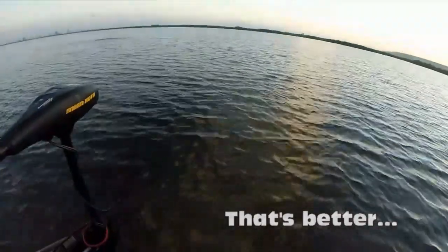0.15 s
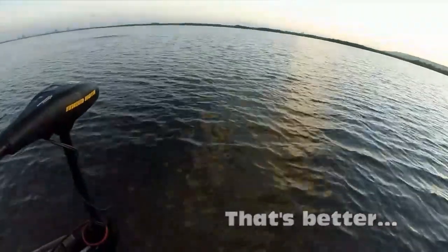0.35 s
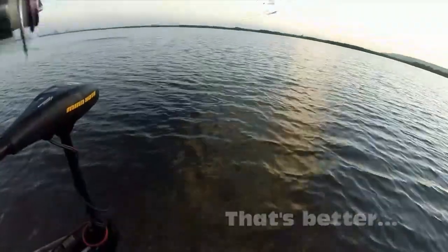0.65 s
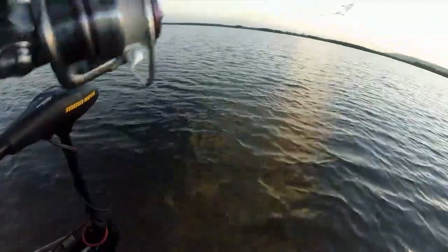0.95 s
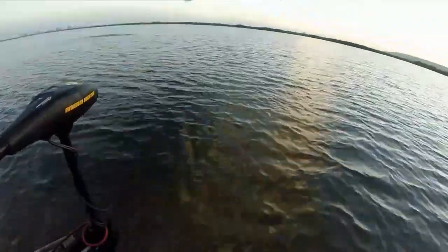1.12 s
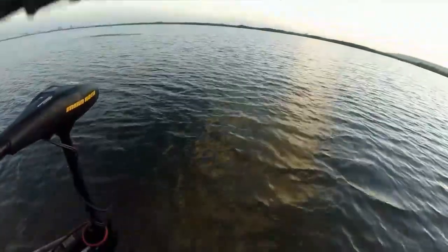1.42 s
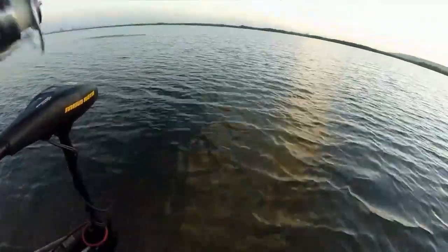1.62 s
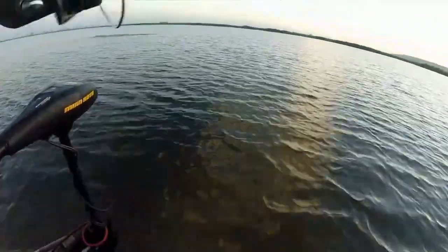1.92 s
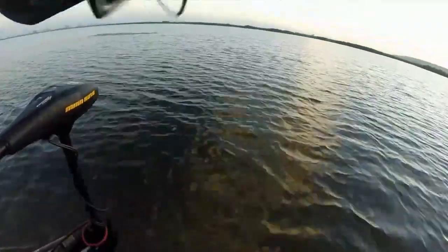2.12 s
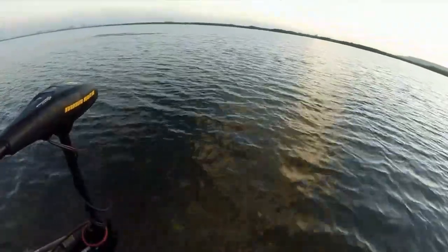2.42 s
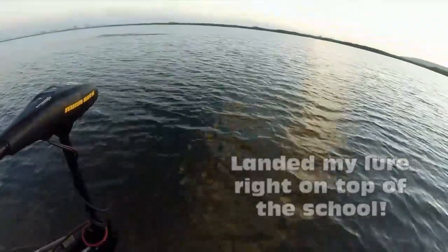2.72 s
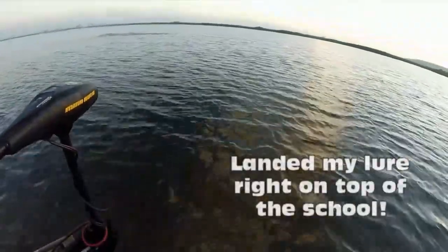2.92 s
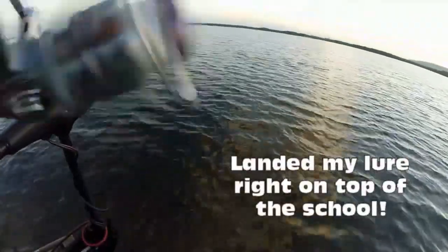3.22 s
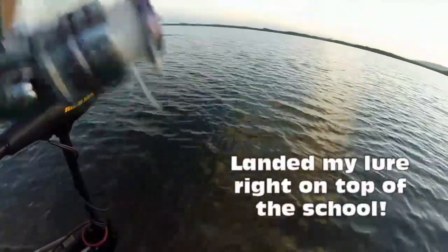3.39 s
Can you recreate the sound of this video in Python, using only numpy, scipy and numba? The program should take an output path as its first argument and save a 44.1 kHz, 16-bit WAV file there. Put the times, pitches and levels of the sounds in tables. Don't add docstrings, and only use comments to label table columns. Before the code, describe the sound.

Spinning reel clicks and buzzes brightly in four pulls, stopping in single ticks, over lapping water

```python
import sys
import numpy as np
from scipy import signal
from scipy.io import wavfile
from scipy.ndimage import uniform_filter1d
from numba import njit

SR = 44100
rng = np.random.default_rng(int(sys.argv[2]) if len(sys.argv) > 2 else 0)


def linear_from_db(decibels):
    return 10 ** (np.asarray(decibels, float) / 20)


def unload_audio(sound):
    columns = np.transpose(np.atleast_2d(sound))
    steps = np.round(np.clip(columns, -1, 1) * 32767)
    wavfile.write(sys.argv[1], SR, steps.astype(np.int16))


N = 156555


@njit
def ring(x, poles, hit):
    y, z = np.empty(len(x)), 0j
    for i in range(len(x)):
        z = z * poles[hit[i]] + x[i]
        y[i] = z.imag
    return y


def band(x, hz, width_hz):
    return signal.lfilter(*signal.iirpeak(hz, hz / width_hz, SR), x)


def level(x, db):
    return x * linear_from_db(db) / np.sqrt(np.mean(x ** 2))


def walk(rate_hz):
    hold = int(SR / rate_hz)
    steps = np.repeat(rng.standard_normal(N // hold + 1), hold)
    return 2.34 * uniform_filter1d(uniform_filter1d(steps, hold), hold)[:N]


def add(out, start_s, sound):
    i = int(start_s * SR)
    out[i:i + len(sound)] += sound[:N - i]


def air():
    # frequency in Hz, level in dB per Hz.
    spectrum = [(15, -37), (25, -4.5), (104, 2.5), (403, -16), (966, -6), (1260, -25.5), (3530, -32),
                (4140, -35.5), (14000, -47.5)]
    table_hz, table_db = np.array(spectrum).T
    out = 0
    for hz in 28 * 2 ** np.arange(0, 9.4, .5):
        flicker_db = 1.5 * walk(7.02)
        db = np.interp(np.log(hz), np.log(table_hz), table_db) + flicker_db
        noise = rng.standard_normal(N)
        out = out + linear_from_db(db) * band(band(noise, hz, hz / 2), hz, hz / 2)
    return level(out, -41)


def tackle():
    # start in seconds, peak in dB, pitch in Hz.
    knocks = [
        (0.0107, -54, 4340),
        (0.0192, -43, 3750),
        (0.0858, -53.5, 2400),
        (3.483, -50, 2420),
    ]
    t, out = np.arange(600) / SR, np.zeros(N)
    for start_s, peak_db, hz in knocks:
        burst = rng.standard_normal(600) * np.exp(-t / 0.0035)
        add(out, start_s, linear_from_db(peak_db + 13.5) * band(burst, hz, 1700))
    return out


def bubble(hz, t60_s, glide=0.02):
    t = np.arange(int(.05 * SR)) / SR
    tone = np.sin(2 * np.pi * hz * t * (1 + glide * t / t60_s))
    return tone * linear_from_db(-60 * t / t60_s) * (1 - np.exp(-t / 0.0013))


def water():
    # start in seconds, peak in dB, pitch in Hz.
    laps = [(0.017, -32, 690), (0.038, -41, 470), (0.0625, -32, 715), (0.242, -37, 816), (0.299, -32, 924),
            (0.334, -27.5, 847), (0.373, -29.5, 975), (0.403, -30.5, 717), (0.465, -30, 742),
            (0.519, -31, 695), (0.549, -26, 746), (0.574, -28, 890), (0.619, -30, 888), (0.639, -32.5, 745),
            (0.703, -31, 986), (0.781, -32, 790), (0.833, -31, 662), (0.957, -27.5, 912), (1.033, -28, 730),
            (1.135, -32, 590), (1.347, -29.5, 729), (1.623, -32, 1113), (1.729, -32, 758.4),
            (1.448, -35, 910), (1.897, -32.5, 883), (1.994, -35.5, 870), (2.061, -31.5, 795),
            (2.416, -33.5, 521.5), (2.574, -35, 707.7), (2.595, -32.5, 953), (2.708, -36, 948),
            (2.76, -34, 803), (2.813, -37, 966), (3.046, -33, 696.4), (3.119, -30, 847), (3.413, -35, 914),
            (3.433, -38, 730), (3.452, -43, 1030), (3.482, -33, 536)]
    bubbles_per_lap, lap_s, gurgles_per_s = 5, .035, 200
    out = np.zeros(N)
    for start_s, peak_db, hz in laps:
        for k, (late, tune, size) in enumerate(rng.random((bubbles_per_lap, 3))):
            later = k > 0
            db = peak_db + 3 - later * (4 + 8 * size)
            pitch_hz = hz * (1 + later * 0.34 * (tune - .5))
            add(out, start_s + later * late * lap_s, linear_from_db(db) * bubble(pitch_hz, 0.05))
    for when, tune, size in rng.random((int(gurgles_per_s * N / SR), 3)):
        gurgle_db = -55 + 17.5 * size ** 2
        gurgle_hz = 844 * linear_from_db(4.49 * (tune - 2.5))
        add(out, when * N / SR, linear_from_db(gurgle_db) * bubble(gurgle_hz, 0.023))
    return out


def spool_speed():
    # time in seconds, teeth per second in Hz.
    pull_1 = [(.19, 119), (0.73, 230), (0.781, 346.6), (0.859, 424.8), (0.939, 191.7)]
    pull_2 = [(1.02, 448.7), (1.25, 564), (1.31, 720), (1.36, 1000), (1.44, 1106), (1.528, 891),
              (1.556, 712), (1.602, 402), (1.67, 199.5)]
    pull_3 = [(1.74, 330.4), (1.84, 378.5), (1.929, 537), (2.021, 430), (2.079, 275)]
    pull_4 = [(2.13, 278), (2.189, 429), (2.265, 805.4), (2.375, 798), (2.45, 499.8), (2.749, 390.9),
              (3.081, 688), (3.199, 503), (3.272, 159)]
    t = np.arange(N) / SR
    time_s, speed_hz = np.vstack([pull_1, pull_2, pull_3, pull_4]).T
    rate_hz = np.interp(t, time_s, speed_hz)
    running = (t > time_s[0]) & (t < time_s[-1])
    teeth = np.cumsum(rate_hz * running) / SR
    return rate_hz, running, teeth


def pawl_strikes(rate_hz, teeth):
    # time in seconds, level in dB, spool against pawl in dB,
    # pawl brightness in dB per kHz.
    pulls = [
        [(.15, -40.5, -0.5, 5.5), (.34, -30.5, -6, 9.5), (.5, -30, 1.5, 7), (.62, -31.5, -5.5, 4),
         (.75, -27.5, -5.5, 1.5), (.895, -29.5, -5, 14.5), (.94, -35.5, -5, 6.5)],
        [(1.03, -36, 3.5, 8.5), (1.12, -37.5, 3, 6.5), (1.21, -32, -1, 6.5), (1.31, -32, 2, 6.5),
         (1.5, -31, -10.5, 9.5), (1.575, -28.5, -1.5, 3.5), (1.63, -31.5, 1.5, 5.5)],
        [(1.7, -29.5, -3, 8.5), (1.79, -26, -6.5, 5.5), (1.92, -33, -1.5, 6.5), (2.04, -39.5, 5, 4)],
        [(2.12, -36.5, -2.5, 7), (2.23, -36, 5, 6), (2.45, -34, 4, 4), (2.72, -29, -5.5, 5), (2.9, -28, 1, 3),
         (3.09, -34.5, 7, 1), (3.22, -27, -2, 4), (3.27, -33.5, -3.5, 9), (3.35, -66, 9, 4)],
    ]
    # time in seconds, peak in dB.
    ticks = [
        (0.1437, -32),
        (0.159, -28),
        (0.1706, -34),
        (0.1796, -26.5),
        (3.2777, -24),
        (3.2908, -29),
        (3.3027, -28.5),
        (3.3199, -29.5),
        (3.3451, -30),
    ]
    # time in seconds,
    # level in dB.
    separate_teeth = [(0.1886, -35.0), (0.1959, -33.0), (0.2036, -31.0), (0.2108, -31.0), (0.2186, -30.5),
                      (0.2256, -31.0), (0.2345, -32.0), (0.2408, -30.5), (0.2473, -30.0), (0.2546, -32.0),
                      (0.2622, -33.5), (0.2697, -31.0), (0.2776, -26.5), (0.2851, -25.5), (0.2914, -29.0),
                      (0.2971, -31.5), (0.3022, -35.0), (0.3075, -31.0), (0.3122, -32.5), (0.317, -28.0),
                      (0.3213, -25.5), (0.3258, -27.0), (0.3301, -30.0), (0.3344, -27.0), (0.3385, -28.5),
                      (0.3474, -26.5), (0.3509, -26.5), (0.3551, -25.0), (0.3601, -29.5), (0.3646, -29.5),
                      (0.3688, -29.0), (0.3779, -27.0), (0.3824, -28.5), (0.3868, -26.5), (0.3902, -28.0),
                      (0.395, -26.0), (0.3998, -28.0), (0.4048, -28.5), (0.4093, -29.5), (0.4161, -27.5),
                      (0.4231, -30.0), (0.431, -28.5), (0.4404, -29.5), (0.447, -30.0), (0.4546, -28.5),
                      (0.4621, -30.0), (0.4707, -31.5), (0.4797, -33.5), (0.4886, -30.5), (0.4973, -29.0),
                    (0.5058, -28.5), (0.5143, -28.0), (0.5222, -30.5), (0.5295, -31.5), (0.5367, -31.0),
                    (0.5437, -28.5), (0.5503, -26.0), (0.5574, -25.5), (0.564, -22.0), (0.5702, -22.5),
                    (0.5765, -23.0), (0.5811, -26.0), (0.5913, -27.0), (0.5957, -30.0), (0.6001, -29.5),
                    (0.6055, -26.0), (0.6094, -28.0), (0.6143, -26.0), (0.6182, -28.0), (0.6227, -31.0),
                    (0.6272, -31.0), (0.6317, -29.0), (0.6366, -23.0), (0.6406, -27.5), (0.6454, -29.0),
                    (0.6509, -25.0), (0.6565, -27.5), (0.6612, -32.5), (0.6672, -24.5), (0.6731, -21.0),
                    (0.679, -22.0), (0.6851, -21.5), (0.6911, -21.5), (0.6978, -18.5), (0.7025, -23.0),
                    (0.707, -28.0), (0.7118, -26.5), (0.7162, -27.5), (0.7196, -31.5), (0.7249, -23.0),
                    (0.729, -28.0), (0.7333, -26.5), (0.7371, -28.5)]
    # time in seconds, extra dB.
    high_spots = [(.285, 1.5), (.572, -1), (.674, -1.5), (.686, 2), (.698, 1.5), (0.773, 5.5), (.812, 3.5),
                  (0.835, 4.5), (1.561, 1.5), (1.73, 5), (1.751, 4.5), (1.811, 6), (1.869, 4), (1.919, 4),
                  (2.221, 2.5), (2.962, -0.5), (2.979, 2.5), (3.022, 1.5), (3.132, 3), (3.197, 2)]
    t = np.arange(N) / SR
    force_s, force_db, spool_db, bright_db = np.vstack(pulls).T
    lone = np.array(ticks)
    apart = np.array(separate_teeth)

    count = int(teeth[-1])
    jitter_teeth = .05 * rng.standard_normal(count)
    at_s = np.interp(np.arange(count) + jitter_teeth, teeth, t)
    density_db = 10 * np.log10(np.interp(at_s, t, rate_hz) / 100)
    scatter_db = 1.0 * rng.standard_normal(count)
    surge_db = .7 * np.interp(at_s, t, walk(60))
    db = np.interp(at_s, force_s, force_db) - density_db + scatter_db + surge_db

    blurred = at_s > apart[-1, 0] + .003
    at_s = np.r_[at_s[blurred], lone[:, 0], apart[:, 0]]
    db = np.r_[db[blurred], lone[:, 1] - 9, apart[:, 1] - 7.5]
    order = np.argsort(at_s)
    at_s, db = at_s[order], db[order]
    high_spot_s = 0.0079
    press_db = sum(extra_db * np.exp(-((at_s - s) / high_spot_s) ** 2) for s, extra_db in high_spots)
    return at_s, db, press_db, np.interp(at_s, force_s, spool_db), np.interp(at_s, force_s, bright_db)


def rattle(rate_hz, teeth):
    # frequency in Hz, level in dB, t60 in seconds,
    # share of the high spot in dB per dB.
    pawl_modes = [(7110, -25.5, 0.0033, 0.49), (7390, -10, 0.013, .3), (8480, 3, 0.0021, 0.33),
                  (8840, 1.5, 0.0058, 2.97), (9330, 3.5, 0.013, 2.17), (9670, -0.5, 0.0052, 0.23),
                  (10700, 5.5, 0.0081, 0.23), (11090, 4, 0.0042, 0.37), (11637, -5, .014, 0.15),
                  (13460, -20, 0.0057, .2), (14300, -14, 0.0047, .2)]
    spool_modes = [(1970, -15, 0.004, 0.2), (3070, -22, 0.017, -2), (3470, -41.5, 0.46, -13),
                   (3600, -19, 0.032, -2), (4446, -13.5, 0.029, -2), (5050, -12, 0.021, 2.5),
                   (5320, -15, 0.014, 2.5), (6050, -44, 0.35, -6), (6080, -41, 0.23, -5),
                   (6101, -46.5, 0.2, -2), (6570, -13.5, 0.0052, -8), (6450, -9, 0.0031, 2.8)]
    # time in seconds, pitch ratio.
    sag = [(1.0, 1.0), (1.17, 0.88), (1.36, 0.98), (1.95, 1.0), (2.1, .93), (2.42, 1.0)]
    at_s, db, press_db, spool_db, bright_db = pawl_strikes(rate_hz, teeth)
    where = (at_s * SR).astype(int)
    hit = np.clip(np.searchsorted(at_s, np.arange(N) / SR) - 1, 0, None)
    chatter_s = 0.0025
    fade = np.exp(-1 / (chatter_s * SR))
    grit = rng.standard_normal(N) * linear_from_db(2)

    def flicks(gain_db):
        snap = np.zeros(N)
        snap[where] = linear_from_db(db + gain_db)
        chatter = grit * signal.lfilter([1], [1, -fade], snap)
        return 1.7 * snap + 0.34 * chatter + 1e-18

    out = 0
    for k, (hz, mode_db, t60_s, share) in enumerate(pawl_modes + spool_modes):
        scatter_db = 1.5 * rng.standard_normal(len(at_s))
        drift_db = 1.8 * walk(6.924)[where]
        gain_db = mode_db + share * press_db + scatter_db + drift_db
        if k >= len(pawl_modes):
            gain_db = gain_db + spool_db
        else:
            gain_db = gain_db + bright_db * np.clip(hz / 1000 - 10.6, -1.2, 1.2)
        detune = .01 * (t60_s < .1)
        tune_hz = hz * (1 + detune * (.4 * walk(5)[where] + rng.standard_normal(len(at_s))))
        if 10000 < hz < 11200:
            tune_hz = tune_hz * np.interp(at_s, *np.array(sag).T)
        if t60_s > .1 and hz > 5000:
            gain_db = gain_db + 20.5 * np.exp(-((at_s - 3.07) / 0.076) ** 2)
        poles = np.exp(2j * np.pi * tune_hz / SR - np.log(1000) / (t60_s * SR))
        out = out + (-1) ** k * ring(flicks(gain_db), poles, hit)
    crack = linear_from_db(-16) * 10 * band(flicks(press_db / 2), 7000, 8000)
    return .55 * out + crack


def hum_and_whine(rate_hz, running, teeth):
    t = np.arange(N) / SR
    fast = np.minimum(rate_hz / 800, 1) ** 2 * running
    turn = 2 * np.pi * teeth + .6 * walk(120)
    octave = linear_from_db(-2) * np.sin(2 * turn) * np.sqrt(fast)
    hum = np.sin(turn) * fast + octave

    whine_hz = 4.35 * rate_hz * (1 + .018 * walk(500))
    whine = np.sin(2 * np.pi * np.cumsum(whine_hz) / SR) * fast * linear_from_db(2.5 * walk(90))
    sung = band(band(whine, 3520, 700), 3520, 700) + linear_from_db(-8) * whine
    handle = linear_from_db(-7) * (t > 2.5) * band(whine, 2854, 387)
    return linear_from_db(-37) * (sung + handle) + linear_from_db(-49 + 2.0 * walk(31.1)) * band(hum, 1200, 900)


def reel():
    rate_hz, running, teeth = spool_speed()
    return rattle(rate_hz, teeth) + hum_and_whine(rate_hz, running, teeth)


def sleeve():
    # centre in Hz, width in Hz, level in dB.
    rustle_bands = [(2420, 150, -6), (2120, 190, -10), (3560, 200, -9), (5030, 350, -9.5)]
    start_s, rise_s = 3.51, 0.018
    t, cloth = np.arange(N) / SR, 0
    for hz, width_hz, db in rustle_bands:
        flutter = linear_from_db(db + 3.4 * walk(70))
        cloth = cloth + flutter * band(rng.standard_normal(N), hz, width_hz) / np.sqrt(width_hz)
    swell = 1 / (1 + np.exp(-np.clip((t - start_s) / rise_s, -50, 50)))
    return level(cloth, -43) * swell


def scene():
    return (air() + tackle() + water() + reel() + sleeve())[None]


def roll_off(x):
    return signal.sosfilt(signal.butter(12, 15740, fs=SR, output="sos"), x)


def record(dry):
    mix = signal.sosfilt(signal.ellip(8, .5, 60, 15300, fs=SR, output="sos"), dry)
    mix = signal.lfilter(*signal.butter(2, 12500, fs=SR), mix)
    return roll_off(mix)


dry = scene()
out = record(dry)
unload_audio(out)
```